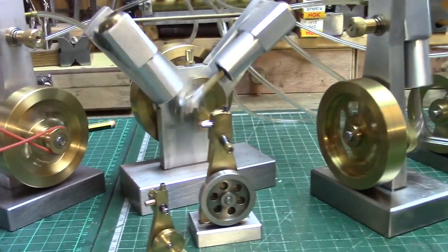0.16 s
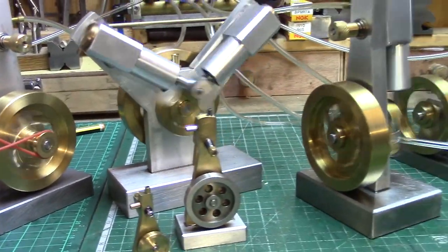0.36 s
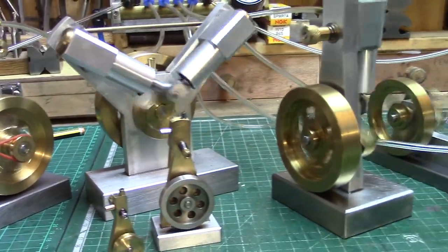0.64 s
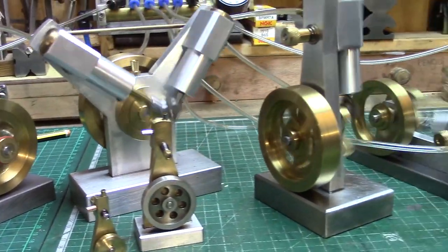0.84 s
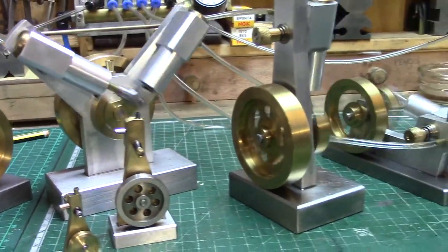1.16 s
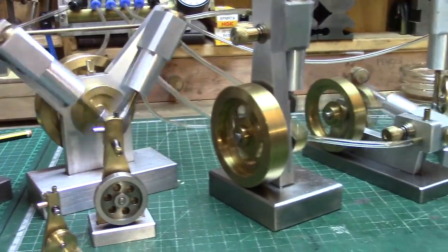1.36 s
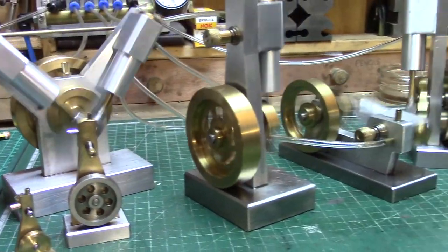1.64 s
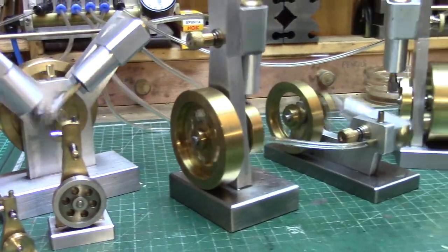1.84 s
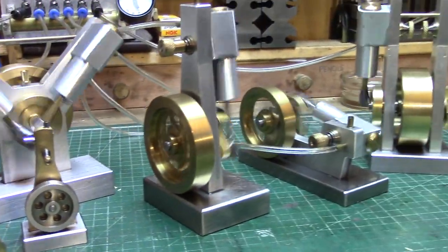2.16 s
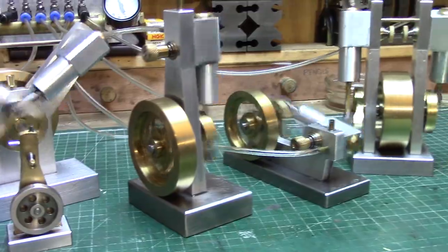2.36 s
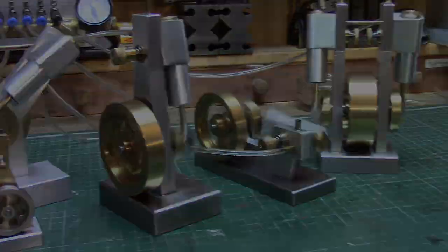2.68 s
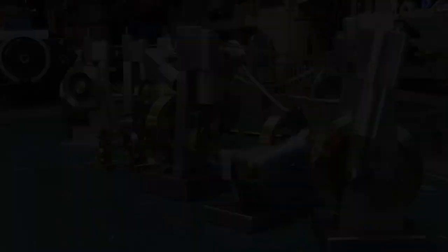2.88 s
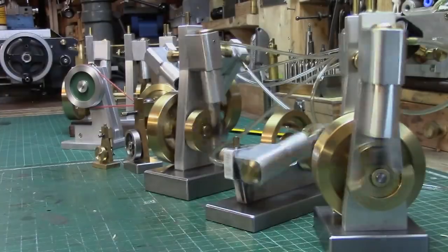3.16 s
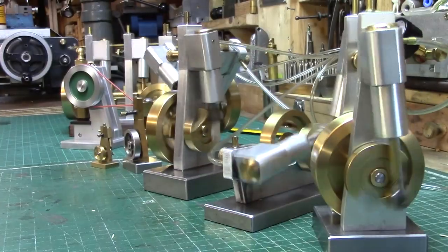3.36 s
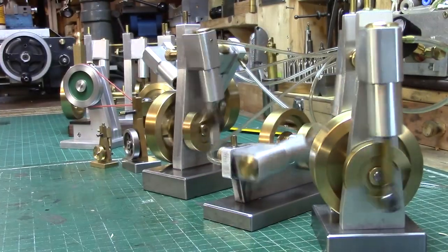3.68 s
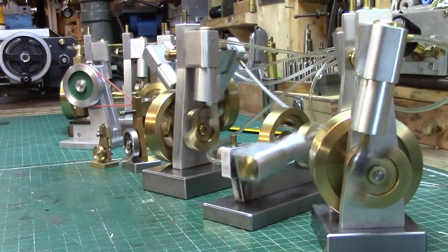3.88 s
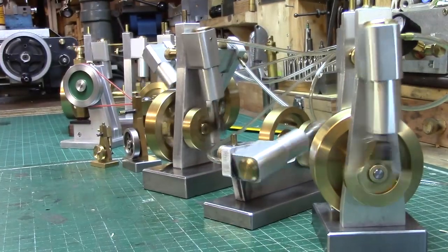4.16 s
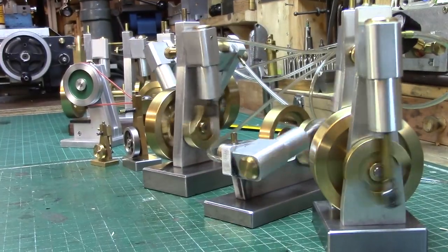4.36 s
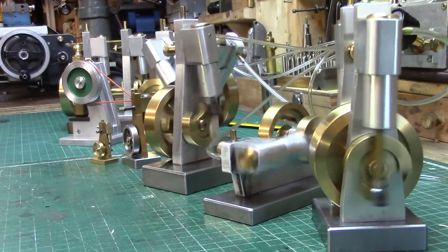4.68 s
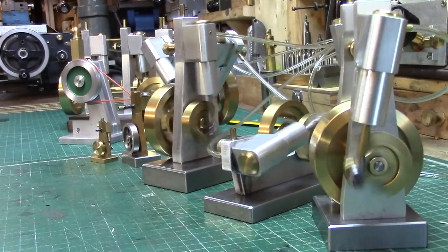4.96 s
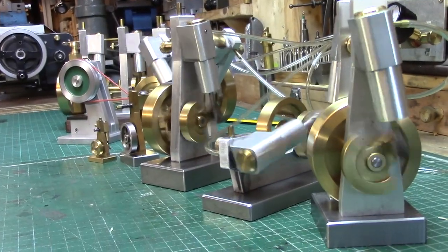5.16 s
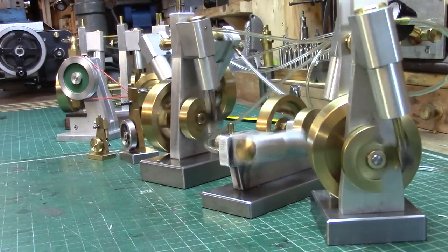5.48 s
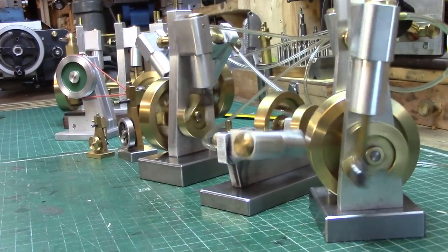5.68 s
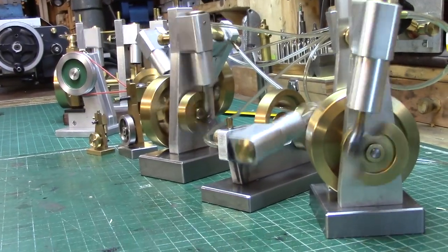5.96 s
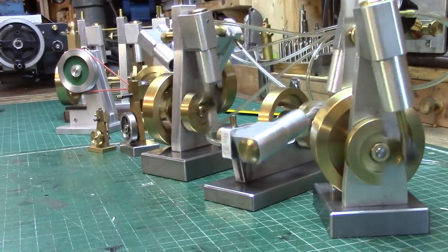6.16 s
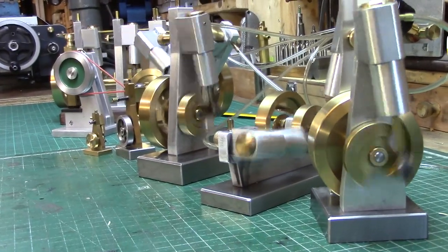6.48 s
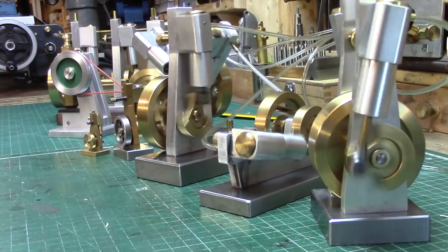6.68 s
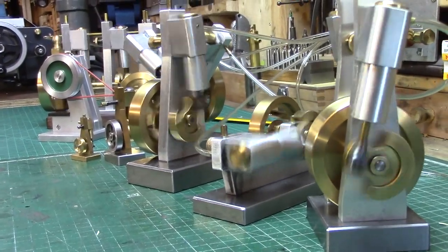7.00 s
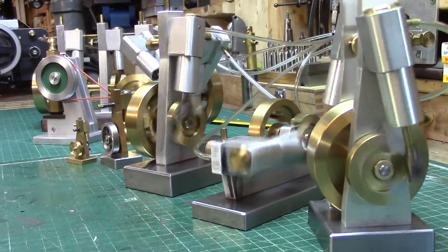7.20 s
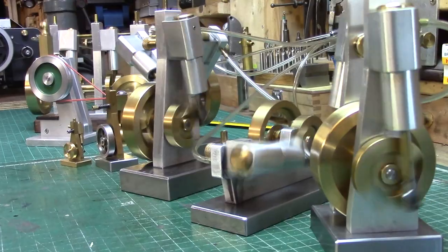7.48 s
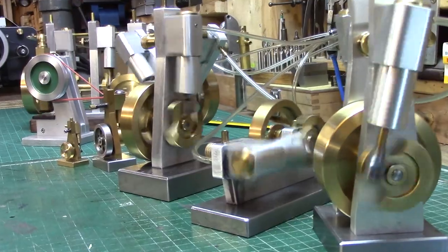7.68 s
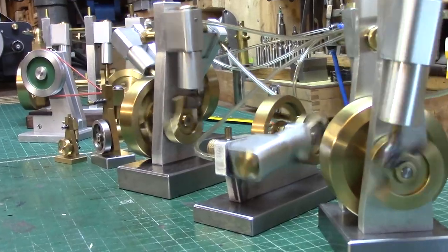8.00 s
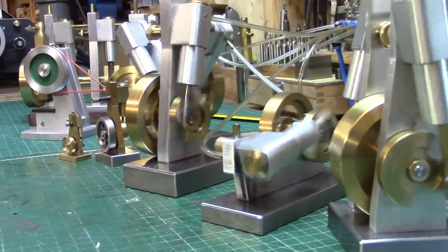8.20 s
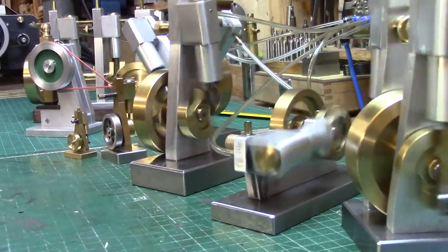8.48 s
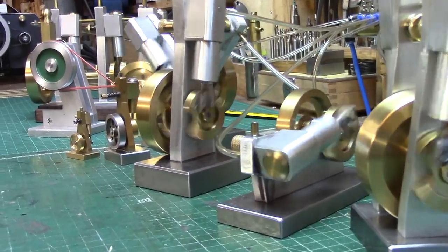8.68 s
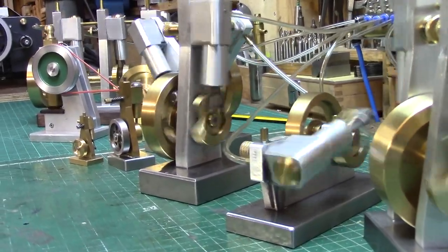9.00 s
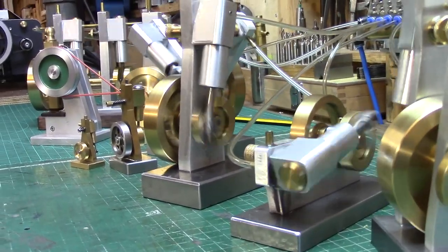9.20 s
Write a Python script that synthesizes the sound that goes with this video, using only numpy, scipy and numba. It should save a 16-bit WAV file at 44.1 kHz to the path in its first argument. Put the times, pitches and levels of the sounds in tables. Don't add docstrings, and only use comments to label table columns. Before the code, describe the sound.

Small air-powered engines run together: bright rapid spitting exhaust, high chirping squeaks, dull wooden knocks, longer airy breaths about five a second and irregular metallic clacks. After a strong opening, everything drops away at three seconds and gradually rebuilds, wider in stereo, with heavier bouncing base thumps and the knocking leaning left. Close camera microphone, thin bass, small damped workshop.

```python
import sys
import numpy as np
from scipy import signal
from scipy.fft import rfft, irfft, next_fast_len
from scipy.io import wavfile
from scipy.ndimage import uniform_filter1d
from numba import njit

SR = 44100
rng = np.random.default_rng(int(sys.argv[2]) if len(sys.argv) > 2 else 0)


def master(y):
    cut = np.clip(np.atleast_2d(y).T, -1, 1)
    pcm = np.round(cut * 32767)
    wavfile.write(sys.argv[1], SR, pcm.astype(np.int16))


def to_linear_factor(level_db):
    exponent = np.asarray(level_db, float) / 20
    return 10 ** exponent


N = 411894
T = np.arange(N) / SR
CUT_S = 3.15


@njit
def svf(x, hz, width):
    y, band, low = np.empty(len(x)), 0., 0.
    g, k = np.tan(np.pi * hz / SR), width / hz
    for i in range(len(x)):
        v = (band + g * (x[i] - low)) / (1 + g * (g + k))
        band, low, y[i] = 2 * v - band, low + 2 * g * v, k * v
    return y


def unit(x):
    return x / np.sqrt(np.mean(x ** 2))


def walk(rate):
    hold = int(SR / rate)
    steps = np.repeat(rng.standard_normal(N // hold + 1), hold)
    return 1.95 * uniform_filter1d(uniform_filter1d(steps, hold), hold)[:N]


def body(x, modes, flicker_db=0):
    out = np.zeros(N)
    for k, (hz, width_hz, db) in enumerate(modes):
        level = to_linear_factor(db + flicker_db * walk(60))
        once = svf(x, 1. * hz, 1.84 * width_hz)
        out += (-1) ** k * level * svf(once, 1. * hz, 1.84 * width_hz)
    return out


def add(out, s, x):
    i = int(s * SR)
    part = x[max(-i, 0):max(N - i, 0)]
    out[max(i, 0):max(i, 0) + len(part)] += part


def ring(hz, t60, rise_s):
    t = T[:int(t60 * SR)]
    decay = np.exp(-np.log(1000) * t / t60)
    return np.minimum(t / rise_s, 1) * decay * np.sin(2 * np.pi * hz * t)


def bump(t, mid_s, width_s):
    return np.exp(-.5 * ((t - mid_s) / width_s) ** 2)


# start_s, level_db, bench_left_minus_right_db, fast_nearness_db, second_nearness_db
LEVELS = [
    (0.0, -26.5, 0.5, -1.5, 6),
    (1.3, -26, 1, 0, 1.5),
    (2.39, -25.5, 0.5, -1, 0.5),
    (2.68, -28, 1, -2.5, -4.5),
    (3.09, -51, 1.5, 1.5, 1.5),
    (3.56, -43.5, -2, 4.5, 5),
    (5.38, -33.5, -3.5, 2.5, 2),
    (5.7, -29, -1, -0.5, -2),
    (7.7, -29, 6, 1, -3.5),
    (9.34, -28.5, 6, 2, -6),
]


def control(s, axis):
    columns = np.transpose(LEVELS)
    return np.interp(s, columns[0], columns[axis])


# start_s, speed_rpm
FAST_SPEED = [(.41, 615.69), (.84, 562.65), (1, 613.36), (1.86, 612.61), (2.14, 567.29), (2.43, 604.62),
              (3.35, 614.8), (3.5, 575.58), (4.64, 621.58), (4.88, 580.74), (5.65, 638), (5.93, 564.08),
              (6.64, 644.42), (7.19, 581.8), (7.52, 649.2), (7.9, 573.71), (8.48, 642.21), (9.11, 578.03)]


def fast_speed():
    return np.interp(T, *np.transpose(FAST_SPEED))


START_TURN = .09
RPM = fast_speed()
ANGLE = START_TURN + np.cumsum(RPM) / 60 / SR
TURN = ANGLE % 1
PORT_S = np.r_[-START_TURN * 60 / RPM[0], T[1:][np.diff(ANGLE // 1) > 0]]


def effort(s):
    smooth_s, slowing_rpm_per_s, slow_rpm = 0.4, 110, 45
    slowing = -uniform_filter1d(np.gradient(RPM) * SR, int(smooth_s * SR)) / slowing_rpm_per_s
    return np.tanh(np.interp(s, T, slowing + (RPM.mean() - RPM) / slow_rpm))


def puffs():
    open_db, close_db, scatter_db = 14, 0.5, 1.0
    facing_db = -2.5 * (PORT_S < CUT_S)
    db = control(PORT_S, axis=1) + control(PORT_S, axis=3)
    chance = scatter_db * rng.standard_normal((len(PORT_S), 2)).T
    return np.transpose([PORT_S, db + open_db + chance[0], db + close_db + facing_db + chance[1]])


# pitch_hz, width_hz, level_db
FAST_PIPE = [(10964, 820, 12.5), (10430, 3380, 3), (6970, 1950, -6.5), (5010, 470, -8),
             (13800, 4900, -58.5), (1370, 2550, -9)]


def fast_exhaust():
    shut_jitter_s = .001
    flow, t = np.zeros(N), T[:int(.1 * SR)]
    chance = rng.standard_normal((len(PORT_S), 2))
    for (s, open_db, close_db), c in zip(puffs(), chance):
        opens = 1 / (1 + np.exp(-(t - .002) / (0.0011 * to_linear_factor(1.0 * c[0]))))
        shuts = 1 / (1 + np.exp((t - .039 - shut_jitter_s * c[1]) / 0.00079))
        spit = to_linear_factor(open_db - 5.0) * np.exp(-np.maximum(t - .006, 0) / 0.0067)
        hiss = to_linear_factor(close_db - 3.5) * (1 + 1.09 * bump(t, 0.0346, 0.0037))
        drain = to_linear_factor(close_db - 41) * np.exp(-np.maximum(t - .04, 0) / 0.079)
        add(flow, s, opens * (shuts * (spit + hiss) + (1 - shuts) * drain))
    rough = to_linear_factor(1.47 * walk(400))
    return flow * rough * unit(body(rng.standard_normal(N), FAST_PIPE, flicker_db=1.8))


# pitch_hz, level_db (per Hz)
LEAK_COLOUR = [(21, -55), (35, -18), (136, -20), (200, 5), (325, -7), (454, -6), (930, -15), (1720, -13.5),
               (2590, -26), (4110, -10.5), (9100, -9.5), (10600, 4), (16000, -32.5)]


def leaks():
    lull_db = 13
    out, (hzs, dbs) = 0, np.transpose(LEAK_COLOUR)
    for hz in 35 * 2 ** np.arange(0, 8.8, .5):
        lull = lull_db * TURN ** 3 * min(hz / 3000, 1)
        db = np.interp(np.log(hz), np.log(hzs), dbs) + 3.93 * walk(25) - lull
        once = svf(rng.standard_normal(N), hz, hz / 2)
        out = out + to_linear_factor(db) * svf(once, hz, hz / 2)
    return unit(out)


# start_s, peak_db, pitch_hz
STRAY_SQUEAKS = [(0.947, -20, 2770), (.645, -26, 2900), (1.0827, -28, 3100), (1.2351, -24, 2860),
                 (2.162, -31, 2990), (2.2467, -21, 3080), (6.1624, -33, 2440), (6.6907, -34, 2450),
                 (6.8486, -28, 2470), (6.998, -23.5, 2510), (7.195, -35, 2380), (9.2279, -31, 2540)]
# start_s, peak_db
HARD_CATCHES = [(0.038, -21.5), (.139, -18), (0.333, -18), (1.04, -19.5), (1.431, -26), (1.53, -23),
                (1.823, -32), (2.334, -22.5), (3.931, -33.5), (4.132, -35.5), (4.43, -35.5), (4.924, -34),
                (5.026, -36), (5.125, -28.5), (6.418, -28), (6.603, -22.5), (6.797, -29), (7.097, -26.5),
                (7.297, -26), (7.49, -29), (7.393, -25.5), (8.18, -24.5), (8.278, -33), (8.473, -27.5),
                (8.564, -30), (8.858, -33.5), (9.165, -39)]


def squeaks(floor_db):
    squeak_db, labour_db, scatter_db = -4.5, -3.5, 1.5
    out, t = np.zeros(N), T[:int(.05 * SR)]
    chirps = [(s - .006, db, hz) for s, db, hz in STRAY_SQUEAKS]
    chirps += [(s - .006, db, 2780 if s < CUT_S else 2640) for s, db in HARD_CATCHES]
    catch_db = control(PORT_S, axis=1) + squeak_db + labour_db * effort(PORT_S)
    catch_db = catch_db + scatter_db * rng.standard_normal(len(PORT_S))
    for s, after, db in zip(PORT_S, PORT_S[1:], catch_db):
        chirps.append((s + .535 * (after - s) - .012, db, 2780 if s < CUT_S else 2640))
    for s, db, hz in chirps:
        swell = bump(t, .012, 0.0039) + 0.19 * bump(t, 0.014, 0.012)
        rising = np.sin(2 * np.pi * hz * (.95 * t + 2.18 * t ** 2))
        add(out, s, to_linear_factor(db - 4.5) * swell * rising)
    flutter_db = 3 * walk(70)
    scrape = unit(body(rng.standard_normal(N), [(2630, 1020, 0)]))
    return out * (1 + 0.69 * walk(700)) + to_linear_factor(floor_db - 15.0 + flutter_db) * scrape


# start_s, peak_db, pitch_hz
STRAY_KNOCKS = [(0.155, -19.5, 380), (.223, -26, 466), (0.812, -15, 716), (1.126, -29, 444),
                (1.091, -21.5, 218), (1.447, -21, 420), (1.777, -22, 199), (1.821, -20, 196),
                (2.518, -25.5, 515), (1.92, -27, 423), (2.102, -19, 415), (3.845, -35, 240),
                (5.279, -31, 468), (5.309, -31, 380), (7.279, -24.5, 484), (7.464, -28, 414),
                (7.674, -17, 202), (8.109, -26, 205), (8.165, -25, 460), (8.361, -24, 390),
                (8.396, -23, 225), (8.456, -22.5, 456), (8.553, -22, 445), (8.646, -18.5, 463),
                (8.52, -31, 297), (8.713, -23.5, 414), (8.755, -17.5, 430), (8.855, -21, 208),
                (8.954, -21, 436), (9.01, -26, 205)]


def blows():
    knock_turn = .485
    pin_hz, pin_db, pin_labour_db = 450, 2, 6.5
    base_hz, base_db = 205, -1.5
    land_hz, land_db, rebound_s, rebound_db = 235, -1.5, .088, -11
    s = PORT_S[:-1] + knock_turn * np.diff(PORT_S)
    chance, db = rng.standard_normal((len(s), 4)).T, control(s, axis=1)
    pin_level_db = db + pin_db + pin_labour_db * effort(s) + 4.0 * chance[0]
    rows = list(zip(s, pin_level_db, pin_hz * (1 + .03 * chance[1])))
    rows += zip(s + 0.0022, db + base_db + 3.0 * chance[2], base_hz * (1 + .02 * chance[3]))
    for s, db, *_ in SLOW_CLACKS:
        lands = [land for land, _ in BASE_THUMPS if abs(land - s) < .02]
        if lands:
            rows.append((lands[0] - .0003, db + land_db, land_hz))
            rows.append((lands[0] + rebound_s, db + rebound_db, 0.92 * land_hz))
        else:
            rows.append((s - .002, db - 11, 405))
    return rows + STRAY_KNOCKS


# pitch_hz, width_hz, level_db
BENCH_WOOD = [(202, 27, -2.5), (218.3, 31, -5.5), (323, 47, -16), (368, 26.5, -5), (460, 89, -6),
              (733, 72, -10), (1160, 490, -22.5)]


def knocks(floor_db):
    out = np.zeros(N)
    for s, db, hz in blows():
        add(out, s, to_linear_factor(db + 4.0) * ring(hz, 11 / hz, 0.26 / hz))
        add(out, s + .025, to_linear_factor(db - 4) * ring(hz, 11 / hz, 0.21 / hz))
        add(out, s + 0.0027, to_linear_factor(db - 8.5) * ring(BENCH_WOOD[0][0], 0.13, 0.0083))
    stroke = 0.3 + bump(TURN, 0.515, 0.061) + 0.4 * bump(TURN, 0.748, 0.021)
    hum = to_linear_factor(floor_db - 9 + 3.34 * walk(45)) * stroke
    bench = unit(body(rng.standard_normal(N), BENCH_WOOD)) * hum
    return signal.sosfilt(signal.butter(4, 165, "high", fs=SR, output="sos"), out + bench)


# start_s, crack_db, flywheel_ring_db, ring_t60_s
SLOW_CLACKS = [(0.0732, -4.5, -18.5, 0.038), (0.3337, -8.5, -48, 0.23), (0.7166, -7.5, -15, 0.033),
               (0.9542, -8.5, -41.5, 0.34), (1.3691, -3.5, -29.5, 0.11), (1.6229, -9, -45, 0.68),
               (2.0067, -5.5, -15, 0.085), (2.251, -11.5, -33, 0.23), (2.6627, -10.5, -16.5, 0.035),
               (2.9133, -23, -52, 0.19), (3.597, -25, -34, 0.038), (4.229, -23.5, -47, 0.15),
               (4.4676, -25.5, -49, 0.094), (4.854, -16, -32, 0.064), (5.1025, -23.5, -43.5, 0.14),
               (5.4874, -14.5, -28.5, 0.062), (5.728, -23, -47, 0.35), (6.1275, -10.5, -42, 0.096),
               (6.3773, -18.5, -40.5, 0.15), (6.7548, -13.5, -25.5, 0.063), (6.995, -19.5, -59, 0.12),
               (7.3973, -11, -41, 0.1), (7.64, -19.5, -32.5, 0.072), (8.015, -12.5, -13.5, 0.045),
               (8.248, -14.5, -40, 0.23), (8.649, -11, -19.5, 0.052), (8.8874, -17.5, -34, 0.066),
               (9.2625, -13.5, -28.5, 0.077)]
# pitch_hz, level_db, share_of_t60
FLYWHEEL_NOTES = [(4492, 4.5, 0.87), (4280, -11, 0.69), (5250, -10, 0.44), (7500, -9, 0.52),
                  (10900, -11, 0.47), (2900, -73, .5)]


def clacks():
    out, crack, t = np.zeros(N), np.zeros(N), T[:4000]
    snap = 0.5 * np.exp(-t / 0.00013) + np.exp(-t / 0.0051) + 0.34 * np.exp(-t / 0.017)
    for s, db, ring_db, t60 in SLOW_CLACKS:
        add(crack, s - .001, to_linear_factor(db) * snap)
        add(out, s, to_linear_factor(db - 30) * ring(90, 0.067, 0.01))
        for hz, mode_db, share in FLYWHEEL_NOTES:
            add(out, s, to_linear_factor(ring_db + mode_db + 9.0) * ring(hz, share * t60, 0.0063))
    noise = rng.standard_normal(N)
    colour = svf(noise, 3030.0, 3240.0) + .5 * svf(noise, 930.0, 650.0) + 0.083 * svf(noise, 9400.0, 3300.0)
    return out * to_linear_factor(2.7 * walk(200)) + to_linear_factor(-8.0) * crack * unit(colour)


# first_exhaust_s, end_s, speed_rpm
SECOND_ENGINE = [
    (.105, 2.95, 320),
    (3.038, 9.34, 326.9),
]


def breaths():
    s = np.concatenate([np.arange(start, end, 60 / rpm) for start, end, rpm in SECOND_ENGINE])
    scatter_db = 0.85 * rng.standard_normal(len(s))
    return zip(s, control(s, axis=1) + control(s, axis=4) + scatter_db)


# pitch_hz, width_hz, level_db
SECOND_PIPE = [(7090, 670, 10), (11130, 1400, 7), (2770, 1030, 1.5), (5190, 520, -3.5), (14500, 3800, -40)]


def second_exhaust():
    flow, t = np.zeros(N), T[:int(.12 * SR)]
    fall = np.exp(-t / 0.013) + 0.39 * np.exp(-t / 0.27)
    sigh = np.minimum(t / 0.0062, 1) * fall / (1 + np.exp((t - .075) / 0.0089))
    for s, db in breaths():
        add(flow, s - .003, to_linear_factor(db + 1.0) * sigh)
        add(flow, s + 0.0945, to_linear_factor(db - 11) * sigh)
    return flow * unit(body(rng.standard_normal(N), SECOND_PIPE, flicker_db=1.8))


# start_s, peak_db
BASE_THUMPS = [(0.329, -15.5), (0.951, -13.5), (1.618, -16.5), (2.246, -15), (2.906, -33), (3.232, -42),
               (3.847, -31.5), (4.472, -27), (5.112, -21), (5.74, -17.5), (6.386, -13.5), (6.999, -12),
               (7.651, -11.5), (8.258, -9.5), (8.898, -10.5)]
# delay_s, level_db
BASE_BOUNCES = [
    (0, -2.5),
    (.09, -5),
    (.15, -7.5),
    (.2, -11),
    (.235, -16.5),
]


def thumps():
    out = np.zeros(N)
    chance = rng.standard_normal((len(BASE_THUMPS), len(BASE_BOUNCES), 2))
    for (s, db), row in zip(BASE_THUMPS, chance):
        for (delay, bounce_db), c in zip(BASE_BOUNCES, row):
            size = to_linear_factor(db + 4.5 + bounce_db + 1.1 * c[0] - 6.0)
            add(out, s + delay, size * ring(110.5, 0.059, 0.0092))
            jog = size * to_linear_factor(-24 + 3.2 * c[1] - 20 * delay)
            jog_hz = FLYWHEEL_NOTES[0][0] * (1 - 0.0116 * abs(c[0]))
            add(out, s + delay, jog * ring(jog_hz, 0.34, 0.0054))
    return out


def echoes(t60, start_s, count):
    t = T[:int(t60 * SR)]
    tail = rng.standard_normal((count, len(t))) * np.exp(-np.log(1000) * t / t60) * (t >= start_s)
    return tail / np.sqrt(np.sum(tail ** 2, axis=1, keepdims=True))


def shape(x, points):
    hz, db = np.transpose(points)
    size = next_fast_len(N, True)
    bins = np.arange(size // 2 + 1) * SR / size + 1
    gain = to_linear_factor(np.interp(np.log(bins), np.log(hz), db))
    quarter_turn = 1j * np.tanh((1800 - bins) / 150)
    return irfft(rfft(x, size) * gain * quarter_turn, size)[:N]


# pitch_hz, level_db
FACING_WIDTH = [(60, -9), (200, -26), (1300, -37), (4400, -16.5), (15000, -15.5)]
# pitch_hz, level_db
ALONG_WIDTH = [(60, -19), (200, -10), (380, -4.5), (1300, 0), (2400, -2), (8000, -9), (15000, -18)]


def scene():
    floor_db, pan_db = control(T, axis=1), control(T, axis=2)
    bench, base = knocks(floor_db), thumps()
    air = fast_exhaust() + second_exhaust() + squeaks(floor_db) + clacks()
    air = air + to_linear_factor(floor_db - 7.5) * leaks()
    dry = air + bench + base
    shop = echoes(0.095, 0.009, count=2)
    wet, other = signal.fftconvolve(dry[None], shop, axes=1)[:, :N]
    skew = 0.78 * dry + 0.32 * other
    along = T > CUT_S
    lean = np.tanh(pan_db / 17) * bench + along * (0.2 * air - 0.15 * base)
    side = lean + np.where(along, shape(skew, ALONG_WIDTH), shape(skew, FACING_WIDTH))
    mid = dry + to_linear_factor(-12.5) * wet
    return np.array([mid + side, mid - side])


def low_pass(x):
    return signal.sosfilt(signal.butter(12, 16990, fs=SR, output="sos"), x)


def record(dry):
    x = signal.sosfilt(signal.butter(4, 60, "high", fs=SR, output="sos"), dry)
    rounded = np.tanh(1.104 * x) / 1.079
    x = signal.sosfilt(signal.ellip(8, .5, 60, 15900, fs=SR, output="sos"), rounded)
    return low_pass(x)


dry = scene()
out = record(dry)
master(out)
```